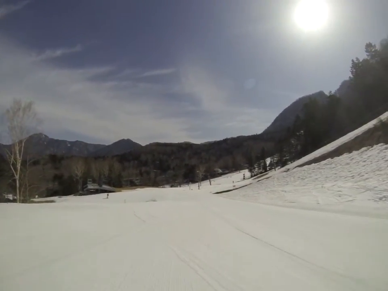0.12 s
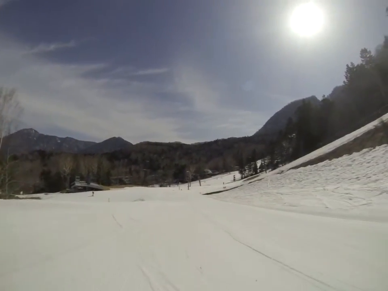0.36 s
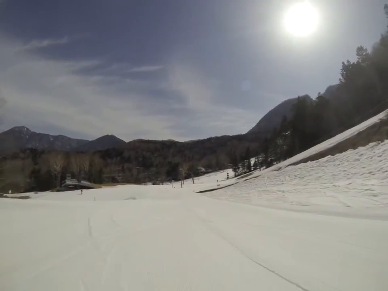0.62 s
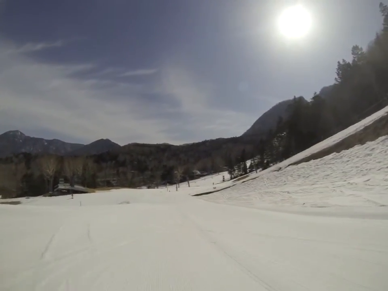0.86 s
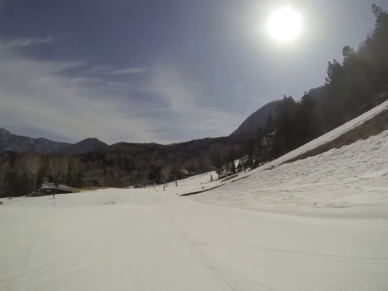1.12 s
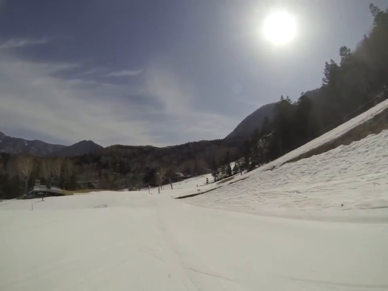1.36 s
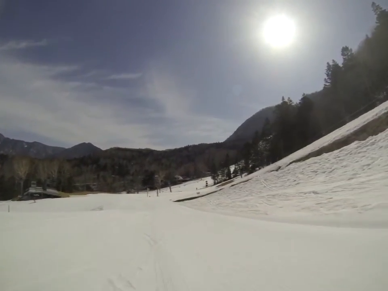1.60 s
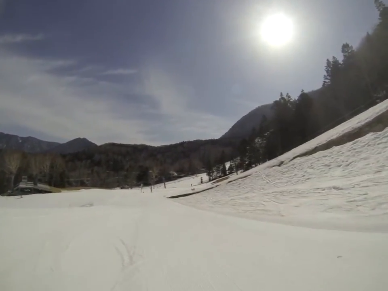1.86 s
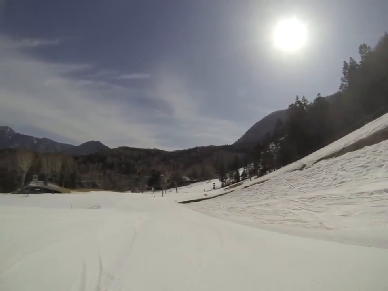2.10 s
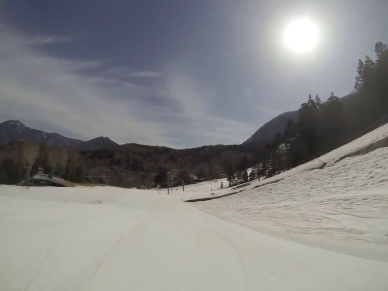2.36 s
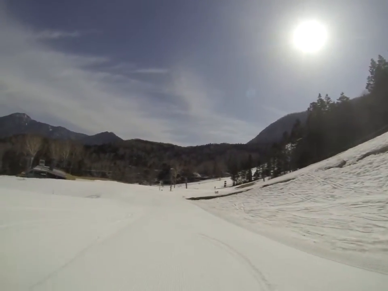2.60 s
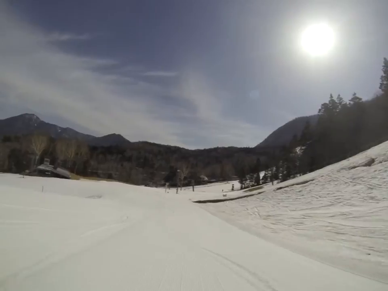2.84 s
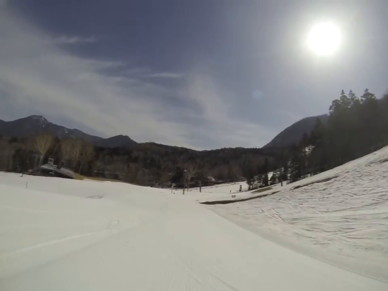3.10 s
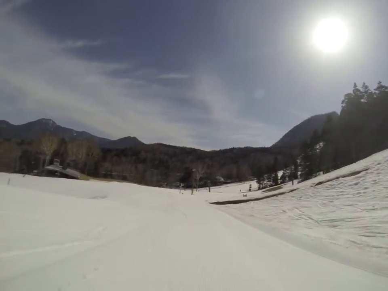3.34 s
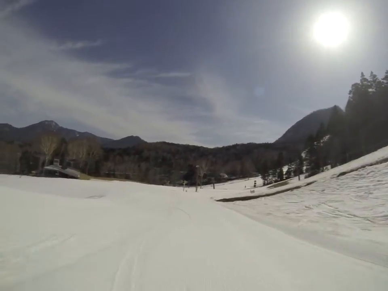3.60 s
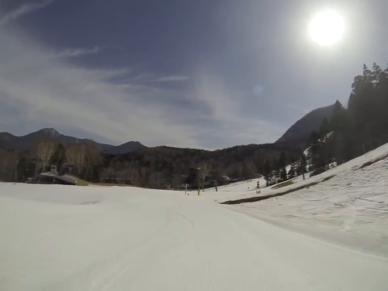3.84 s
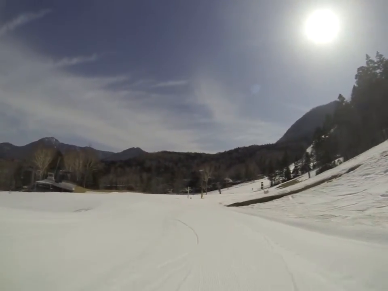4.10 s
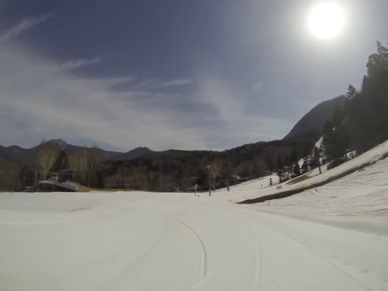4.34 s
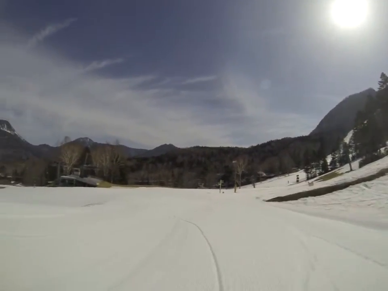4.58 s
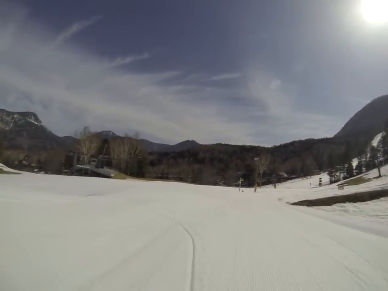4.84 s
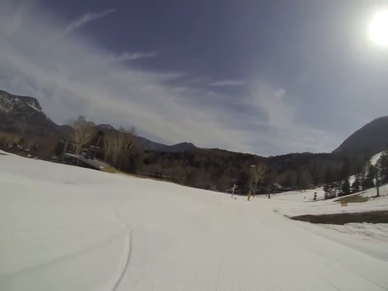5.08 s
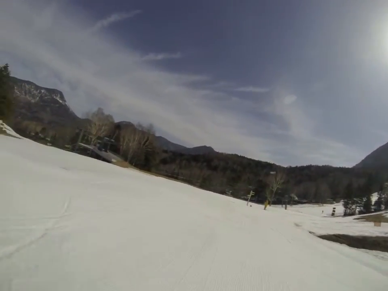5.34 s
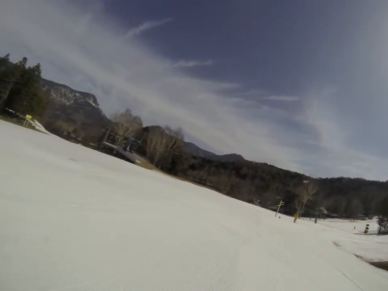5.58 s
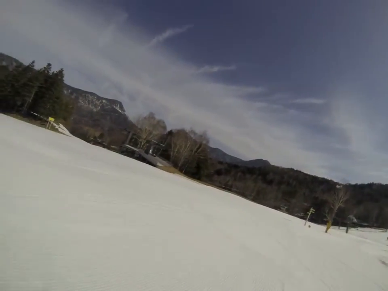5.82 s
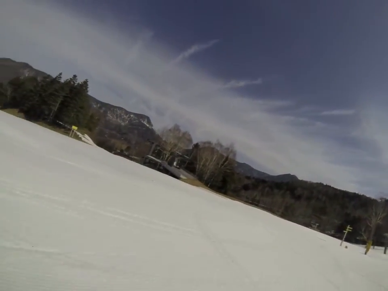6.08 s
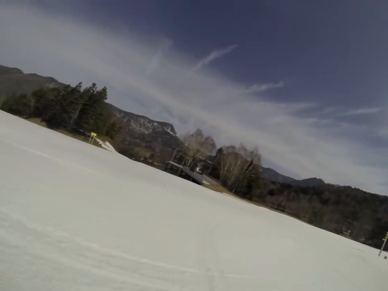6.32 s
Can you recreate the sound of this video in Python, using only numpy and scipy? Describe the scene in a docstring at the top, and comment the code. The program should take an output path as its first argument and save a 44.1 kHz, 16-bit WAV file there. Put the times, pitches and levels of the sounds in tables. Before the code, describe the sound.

A skier glides downhill with a thin, boxy hiss and small snow cracks, wind buffeting low, then the skis scrape hard into a turn.

```python
"""Skis hiss and scrape on a groomed slope, heard by a camera in a sealed case on the skier's body.
Noise shaped by load, edges and hops makes the glide, short noise bursts its cracks; both ring through the case.
Wind acts on the microphone directly: slow membrane swings thump, filtered noise rumbles, roars and rushes.
The camera's electronics add hiss and a faint pulsing whine. Two decaying steps click as the signal
jumps; at the second the pulsing skips ahead."""
import sys
import numpy as np
from scipy import signal
from scipy.fft import rfft, irfft
from scipy.io import wavfile
from scipy.ndimage import uniform_filter1d

SR = 44100
rng = np.random.default_rng(int(sys.argv[2]) if len(sys.argv) > 2 else 0)


def wav_out(sig):
    """Save sig, one row per channel (or a flat mono array), as 16-bit PCM at SR to the path in sys.argv[1]."""
    wavfile.write(sys.argv[1], SR, np.round(np.clip(np.atleast_2d(sig).T, -1, 1) * 32767).astype(np.int16))


def invert_db(x):
    """Field ratio 10**(x/20) for x, a level in decibels (scalar or array-like)."""
    u = np.asarray(x, float) / 20
    return 10 ** u


N = 284445  # samples


def evened(x):
    """Scales to rms 1."""
    return x / np.sqrt(np.mean(x ** 2) + 1e-20)


def read(points, hz):
    """Reads a spectrum on a log-frequency axis."""
    f, value = np.transpose(points)
    return np.interp(np.log(hz + 1), np.log(f + 1), value)


def add(mix, s, sound):
    """Mixes a sound in at second s."""
    part = mix[max(round(s * SR), 0):][:len(sound)]
    part += sound[:len(part)]


def drift(seconds):
    """Slow chance of rms 1 that changes over about this time."""
    size = max(int(seconds * SR), 2)
    once = uniform_filter1d(rng.standard_normal(N), size)
    return evened(uniform_filter1d(once, size))


def coloured(points):
    """Steady noise of rms 1 with the given spectrum."""
    hz = np.fft.rfftfreq(N, 1 / SR)
    white = rfft(rng.standard_normal(N))
    return evened(irfft(white * invert_db(read(points, hz)), N))


# resonances of the sealed case: centre_hz, width_hz, level_db (before seal and dips)
CASE_MODES = [(1292, 210, -4.5), (1412, 120, 1), (1500, 164, 0.5), (1790, 92, -7), (1970, 250, -8),
              (2200, 390, -13.5), (2559, 280, -5.5), (2766, 340, -8), (3434, 278, -7.5), (3620, 146, -12),
              (4056, 94, -18), (4330, 55, -18), (4580, 240, -22), (4830, 170, -19.5), (5176, 540, -19),
              (6100, 320, -29), (6435, 330, -26.5), (7320, 730, -31), (7890, 470, -26.5), (8500, 250, -28),
              (9000, 340, -32), (9540, 320, -30.5), (9970, 220, -32.5), (10770, 700, -33.5),
              (11950, 1300, -32), (13200, 700, -39), (14000, 550, -26.5), (15000, 700, -44)]
# narrow dips where neighbouring resonances cancel: centre_hz, width_hz, depth_db
CASE_DIPS = [(1690, 25, -5.5), (1870, 68, -1.5), (3160, 110, 0), (3747, 59, -22), (4300, 46, -14),
             (4300, 33, -14), (6000, 130, -5), (10300, 150, -2)]


def case_db(hz, closed_hz=1050):
    """Steep-flanked resonances add in power; narrow dips lie between some; the seal shuts out the lows."""
    power = sum(invert_db(db) ** 2 / (1 + (2 * (hz - f) / w) ** 2) ** 1.7 for f, w, db in CASE_MODES)
    dips_db = sum(min(db, 0) / (1 + (2 * (hz - f) / w) ** 2) for f, w, db in CASE_DIPS)
    seal = 0.0016 + 1 / (1 + (closed_hz / (hz + 1)) ** 8)
    return 10 * np.log10(power * seal) + dips_db


def through_case(x):
    """Causal ringing of the case: the phase follows from the log gain."""
    log_gain = np.log(invert_db(case_db(abs(np.fft.fftfreq(8192, 1 / SR)))))
    minimum_phase = np.exp(np.conj(signal.hilbert(log_gain)))
    ring = np.fft.ifft(minimum_phase).real[:4096]
    return signal.oaconvolve(x, ring)[:N]


def crystals(grains_per_s=3000, spread_db=2.0, grain_share=0.21, flicker_db=1.0, bumps_db=0.08):
    """White rubbing noise with snapping grains; the snow's texture makes all of it flicker together."""
    grain_size = invert_db(spread_db * np.minimum(rng.exponential(1, N), 5))
    snaps = rng.random(N) < grains_per_s / SR
    grains = evened(grain_size * snaps * rng.standard_normal(N))
    rub = np.sqrt(1 - grain_share) * rng.standard_normal(N) + np.sqrt(grain_share) * grains
    texture_db = flicker_db * drift(.007) + bumps_db * drift(.02)
    return evened(rub * invert_db(texture_db))


# bands of drone, scrape, spray and fizz: from_hz, to_hz
GLIDE_BANDS = [(1150, 1650), (2200, 3700), (7000, 9800), (10500, 14600)]
# the same four layers as they leave the case: level_db (at the resting load), load_share (dB per dB),
# bite_share, spray_share, lift_share (each dB per dB)
GLIDE_LAYERS = [(-55.5, 1, 0.032, 0, 0.68), (-57, 1, 1, 0, 0.94), (-73.5, 0.87, 0, 0.59, 0.55),
                (-81.5, 1.3147, 0.27, 1.27, 0.91)]
# skis on snow: start_s, load_db, bite_db (extra, from the edges), spray_db (extra, thrown up); before the shares
SKI_LOAD = [(0.0, -56.5, -1.5, 2), (0.3, -55.5, -0.5, -0.5), (0.6, -59, -1.5, 3), (0.9, -56.5, 0, 2),
            (1.4, -56.5, 1, -1), (1.7, -54, -1, -2), (2.1, -54, 1.5, 3), (2.4, -55, 4, 2),
            (2.75, -55, 3, 2.5), (3.1, -53.5, 4, 3), (3.4, -55.5, 3, 4), (3.75, -51.5, 1, 1),
            (4.1, -52, 3, 0), (4.37, -47, 1.5, -2.5), (4.6, -51, 0, 1), (4.9, -46.5, -1, -3.5),
            (5.1, -41, -4.5, -5.5), (5.35, -41, -2.5, -0.5), (5.65, -39.5, -5.5, -0.5),
            (5.815, -42.5, -3, 0), (5.825, -42.5, -2, 5), (5.95, -42, -2, 2.5), (6.2, -40.5, -1, 2.5),
            (6.45, -41.5, -3.5, 3.5)]
REST_DB = -55  # the resting load
# the skis go light over a hump and land again: landing_s, light_s, change_db (before lift_share)
LIFTS = [(0.33, 0.066, -3), (0.8, 0.55, -3), (1.61, 0.14, -3), (1.95, 0.17, -7.5), (2.27, .06, -8),
         (2.419, 0.015, -3), (2.659, 0.24, -9), (2.98, 0.15, -4), (3.24, 0.087, -9), (3.57, 0.06, -8.5),
         (3.899, .07, -3.5), (4.48, 0.078, -4), (4.86, 0.14, -4), (5.53, 0.14, -2), (5.822, 0.16, -5.5)]


def skis(chatter_db=1, chatter_s=0.017, landing_s=0.0077, patchy_db=0.77):
    """Rubbing noise tilted so that four layers leave the case as load, bite, spray and lifts ask."""
    hz, t, spectrum = signal.stft(crystals(), SR, nperseg=256)
    s, load_db, bite_db, spray_db = np.transpose(SKI_LOAD)
    load_now = np.interp(t, s, load_db) - REST_DB
    bite_now = np.interp(t, s, bite_db)
    spray_now = np.interp(t, s, spray_db)
    lift_now = 0
    for land, light, db in LIFTS:
        going_light = 2 * (t - land) / light + 2
        load_returning = 1 - (t - land) / landing_s
        lift_now = lift_now + db * np.clip(np.minimum(going_light, load_returning), 0, 1)

    passed = invert_db(case_db(np.arange(SR // 2))) ** 2 / (SR // 2)  # power the case lets out, per Hz
    source_db = []
    for (db, load, bite, spray, lift), (lo, hi) in zip(GLIDE_LAYERS, GLIDE_BANDS):
        wanted_db = db + load * load_now + bite * bite_now + spray * spray_now + lift * lift_now
        chatter = np.interp(t * SR, np.arange(N), drift(chatter_s))  # each layer by itself
        source_db.append(wanted_db + chatter_db * chatter - 10 * np.log10(passed[lo:hi].sum()))

    # crossfade between neighbouring layers on a log-frequency axis
    centres_hz = [np.sqrt(lo * hi) for lo, hi in GLIDE_BANDS]
    place = np.interp(np.log(hz + 1), np.log(centres_hz), range(4))
    field_db = np.maximum(1 - abs(place[:, None] - np.arange(4)), 0) @ source_db
    patches = rng.standard_normal(spectrum.shape)
    patches = uniform_filter1d(patches, size=5, axis=0)
    patches = evened(uniform_filter1d(patches, size=16, axis=1))
    return signal.istft(spectrum * invert_db(field_db + patchy_db * patches), SR, nperseg=256)[1][:N]


# strong gusts that set the membrane swinging: peak_s, peak_db, swing_hz, length_s (at half height)
STRONG_GUSTS = [(0.087, -21, 39.7, 0.04), (0.299, -34, 30, 0.023), (0.647, -23.5, 31.4, 0.04),
                (0.775, -27, 31.4, 0.078), (0.89, -24, 22.3, 0.061), (1.03, -32, 24, 0.067),
                (1.148, -27.5, 25, 0.033), (1.209, -19, 32, 0.033), (1.285, -25.5, 34.4, 0.053),
                (1.413, -26.5, 25, 0.063), (1.51, -28.5, 28.7, 0.069), (1.642, -28.5, 31, 0.04),
                (1.765, -30, 60, 0.041), (1.805, -28, 25.84, 0.11), (1.955, -32, 69, 0.02),
                (1.99, -28.5, 23.97, 0.08), (2.1, -33.5, 27, 0.12), (2.353, -31.5, 43, 0.088),
                (2.702, -25.5, 25.2, 0.05), (2.95, -29.5, 33.5, 0.098), (3.48, -24, 36.6, 0.045),
                (3.617, -22.5, 25.5, 0.071), (3.729, -21.5, 24.4, 0.038), (3.888, -33.5, 27.5, 0.04),
                (4.052, -21.5, 43, 0.045), (4.17, -27.5, 29.6, 0.07), (4.304, -30, 29, 0.049),
                (4.4, -23, 22.6, 0.041), (4.537, -26.5, 24.1, 0.056), (4.65, -26.5, 37, 0.037),
                (4.713, -23, 24, 0.032), (4.82, -26.5, 22, 0.077), (4.94, -31.5, 25, 0.046),
                (5.092, -30.5, 34, 0.046), (5.25, -30.5, 39, 0.052), (5.44, -23, 20, 0.05),
                (5.57, -25.5, 25, 0.04), (5.657, -29, 31, 0.038), (5.854, -31, 28, 0.066),
                (5.949, -29, 20, 0.029), (6.08, -31, 36, 0.09), (6.2, -28, 18.4, 0.1),
                (6.428, -25.5, 18, 0.091)]
# headwind: start_s, level_db (over a moderate wind)
HEADWIND = [(0.0, -5), (0.5, -9.5), (1.0, -5.5), (1.6, -6.5), (2.0, 1), (2.6, -2.5), (3.0, -1), (3.4, -4.5),
            (3.7, -0.5), (4.5, 3), (5.25, 5.5), (5.8, 2), (6.1, 4.5), (6.45, 3.5)]


def gusts(per_s=18, small_db=-36.5, spread_db=1.5, small_hz=27.71, small_s=0.0314):
    """Size and pace of the swing: each gust swells it under a bell and pulls it to its own pace."""
    # small buffets come at random, stronger in a stronger wind
    count = int(per_s * N / SR)
    jitter, strength, tuning = rng.standard_normal((count, 3)).T
    at = (np.arange(count) + .5 + 0.302 * jitter) / per_s
    level_db = small_db + spread_db * strength + np.interp(at, *np.transpose(HEADWIND))
    small = np.transpose([at, level_db, small_hz * np.exp(.22 * tuning), np.full(count, small_s)])
    s, db, hz, length = np.vstack([STRONG_GUSTS, small]).T[:, :, None]

    t = np.arange(0, N, 32) / SR
    bells = invert_db(db) * np.exp(-np.log(2) * (2 * (t - s) / length) ** 2)
    size = np.sqrt((bells ** 2).sum(axis=0))
    pace_hz = (bells ** 2 * hz).sum(axis=0) / (size ** 2 + 1e-12)
    return [np.interp(np.arange(N) / SR, t, curve) for curve in (size, pace_hz)]


def thumps(size, pace_hz, skew=0.13, wander=0.1623):
    """One slow swing of the membrane; sharp crests add an octave."""
    cycles = np.cumsum(pace_hz * (1 + wander * drift(0.0323))) / SR
    angle = 2 * np.pi * (rng.random() + cycles)
    return size * (np.cos(angle) + skew * drift(0.1) * np.cos(2 * angle))


# spectra of the wind's three layers, only their shape counts: pitch_hz, level_db (per Hz)
RUMBLE = [(8, -22), (18, 19), (28, 10.5), (42, 5.5), (60, 9.5), (90, -41), (300, -90)]
ROAR = [(30, -20), (60, -0.5), (100, -2.5), (150, -10), (220, -21.5), (400, -43), (1200, -88)]
RUSH = [(80, -21), (180, 3), (300, 0.5), (500, -4.5), (900, -7), (1500, -12), (4000, -63)]


def wind(size, pace_hz, lumpy_db=1.5, rush_lumpy_db=-0.5):
    """Faint low rumble, a lumpy roar rising with each gust, a smoother rush growing with the ski load."""
    t, lumps = np.arange(N) / SR, drift(0.021)
    wind_db = np.interp(t, *np.transpose(HEADWIND))
    load_db = np.interp(t, *np.transpose(SKI_LOAD)[:2]) - REST_DB
    gust_db = 20 * np.log10(size / invert_db(-32) + 0.57)
    pace_db = 20 * np.log10(pace_hz / 27.71 + .1)  # over the pace of a usual small buffet
    roar_db = -53.5 + wind_db + 0.36 * gust_db + 0.44 * pace_db
    rush_db = -67 + 0.17 * wind_db + 0.53 * load_db
    rumble = invert_db(-48) * coloured(RUMBLE)
    roar = invert_db(roar_db) * evened(coloured(ROAR) * invert_db(lumpy_db * lumps))
    rush = invert_db(rush_db) * evened(coloured(RUSH) * invert_db(rush_lumpy_db * lumps))
    return rumble + roar + rush


# spectrum of the hiss, only its shape counts: pitch_hz, level_db (per Hz)
HISS = [(200, -0.5), (1000, -4.5), (5000, -11), (9000, -19.5), (11000, -18.5), (14300, -18)]
# tones of the whine: pitch_hz, width_hz, level_db (rms while on)
WHINE = [(6440, 70, -75), (12915, 80, -80)]


def electronics(pulses_per_s=50, on_share=.4, first_s=.0078, skip_s=3.2817, skipped_s=.003):
    """Hiss and a wavering whine switched on and off; its pulsing skips ahead once."""
    t = np.arange(N) / SR
    clock = t + skipped_s * (t > skip_s) - first_s
    on = uniform_filter1d(1. * (clock * pulses_per_s % 1 < on_share), size=30)
    waver = drift(0.00355)
    whine = np.zeros(N)
    for hz, width, db in WHINE:
        cycles = np.cumsum(hz + width * waver / 2) / SR
        whine += invert_db(db) * np.sqrt(2) * np.sin(2 * np.pi * cycles)
    top = signal.cheby1(10, .5, 14450, fs=SR, output="sos")  # the hiss fades above 14450 Hz
    hiss = signal.sosfilt(top, coloured(HISS))
    return invert_db(-66) * hiss + on * whine


# crusts and ridges that crack under the ski: start_s, level_db (before boost and case), dullness (0-1)
CRACKS = [(0.2, -36.5, 0.5), (0.2412, -44, 0.7), (0.349, -35, 0.5), (0.788, -51, 0.6), (0.817, -31.5, 0.4),
          (1.085, -31.5, 0.4), (1.6259, -29, 0.52), (1.6905, -33, 0.38), (1.74, -27.5, 0.7),
          (1.8017, -32, 0.75), (2.116, -29, 0.35), (2.313, -33, 0.76), (2.7029, -40, 0.4),
          (4.151, -30.5, 0.64), (4.4789, -36.5, 0.43), (5.1939, -23.5, 0.68)]


def cracks(t60=0.017, boost_db=10):
    """Short bursts of noise, sharp at the front; a dull one has lost its treble."""
    out, t = np.zeros(N), np.arange(2000) / SR
    bursts = rng.standard_normal((len(CRACKS), len(t))) * invert_db(-60 * t / t60)
    for (s, db, dull), burst in zip(CRACKS, bursts):
        add(out, s, invert_db(db + boost_db) * signal.lfilter([1 - dull], [1, -dull], burst))
    return out


# clicks: start_s, step_db (before rise and settling), direction (sign), rise_s, settling_s
SKIPS = [(.9697, -40.5, 1, .0002, .004), (3.2817, -27.5, -1, .00001, .011)]


def skips():
    """The signal jumps, then settles back."""
    out, t = np.zeros(N), np.arange(4000) / SR
    for s, db, way, rise, settle in SKIPS:
        jump = 1 - np.exp(-t / rise)
        settling = np.exp(-(t / settle) ** 1.46)
        add(out, s, np.sign(way) * invert_db(db) * jump * settling)
    return out


def scene():
    """Snow sounds pass the case; wind acts on the microphone directly."""
    size, pace_hz = gusts()
    snow = through_case(skis() + cracks())
    air = thumps(size, pace_hz) + wind(size, pace_hz)
    return (snow + air + electronics())[None]


def roll_off(x):
    """The treble ends steeply here."""
    return signal.sosfilt(signal.butter(12, 15840, fs=SR, output="sos"), x)


def record(dry):
    """Limits the band to 15300 Hz, then adds the skips."""
    edge = signal.firwin(1023, 15300, window=("kaiser", 9), fs=SR)
    padded = np.pad(dry, [(0, 0), (511, 511)], "reflect")
    limited = signal.fftconvolve(padded, edge[None], "valid")
    return roll_off(limited + skips())


dry = scene()
out = record(dry)
wav_out(out)
```